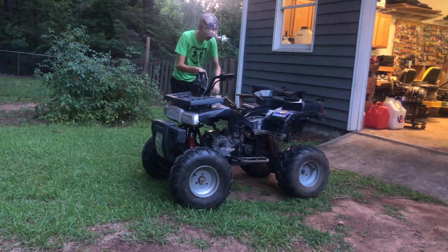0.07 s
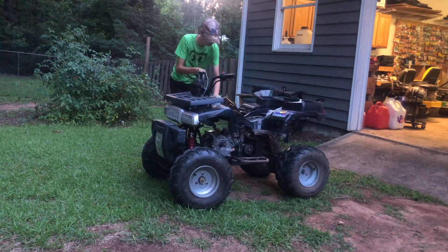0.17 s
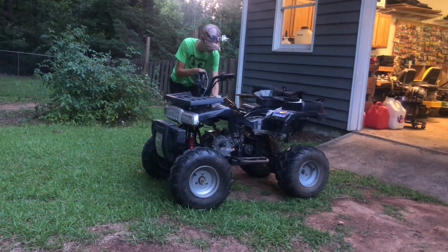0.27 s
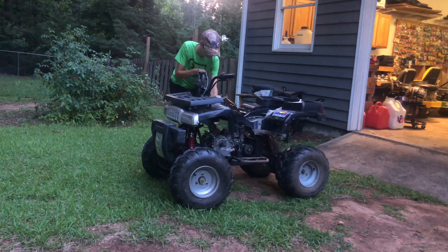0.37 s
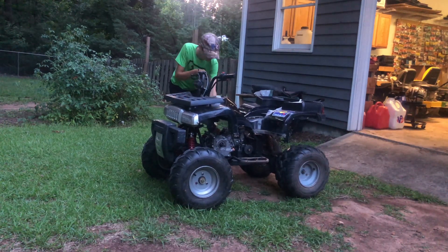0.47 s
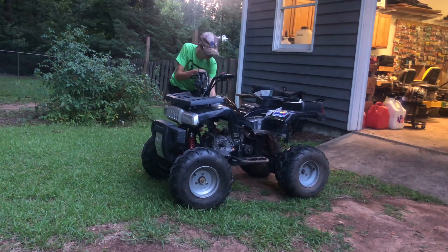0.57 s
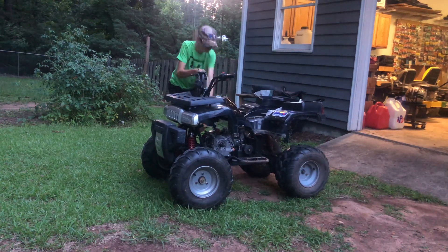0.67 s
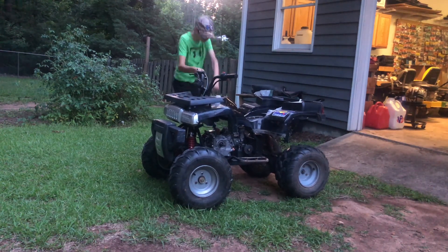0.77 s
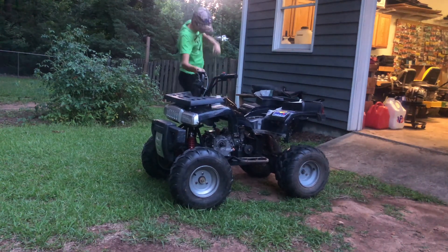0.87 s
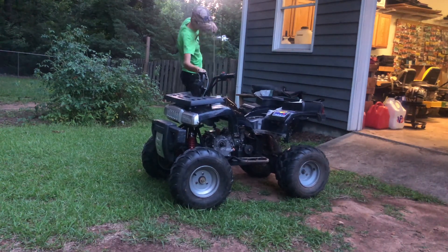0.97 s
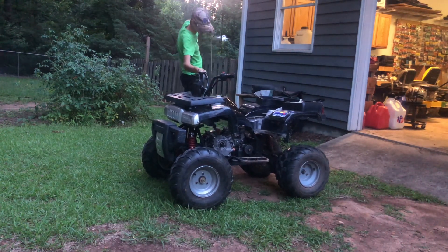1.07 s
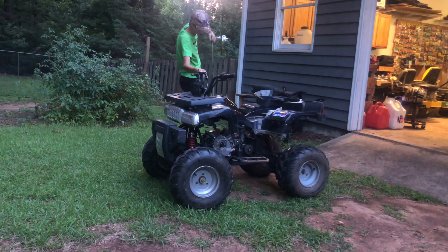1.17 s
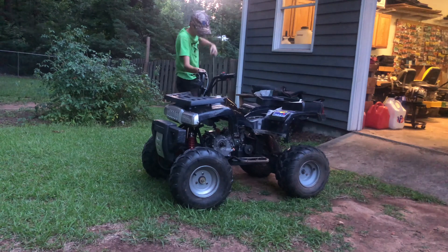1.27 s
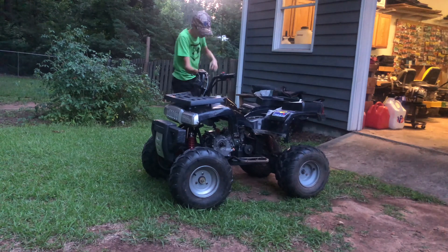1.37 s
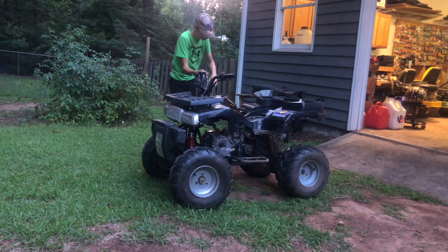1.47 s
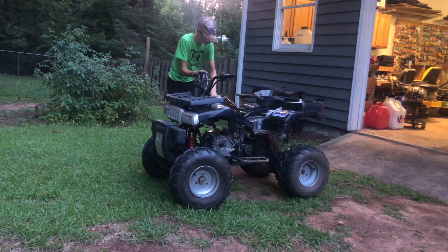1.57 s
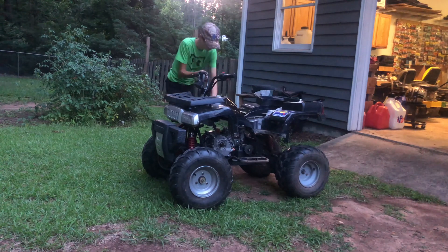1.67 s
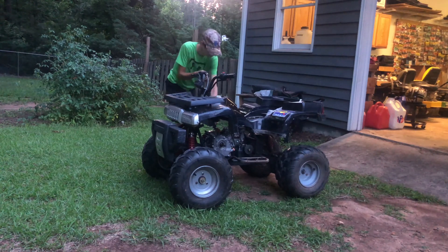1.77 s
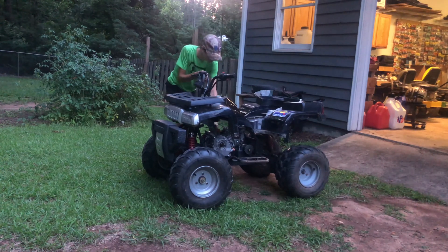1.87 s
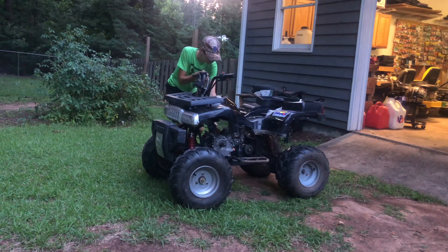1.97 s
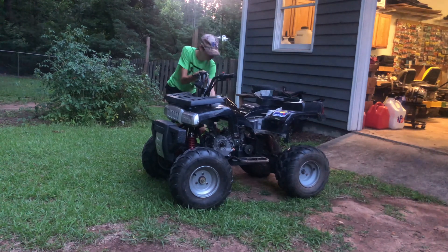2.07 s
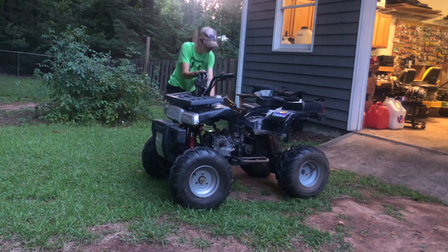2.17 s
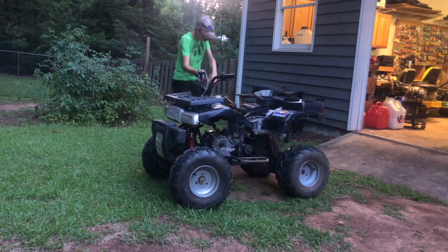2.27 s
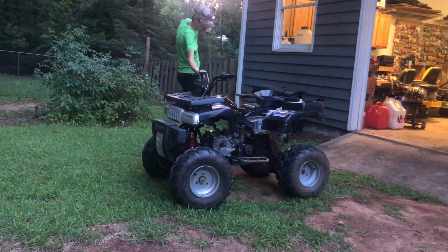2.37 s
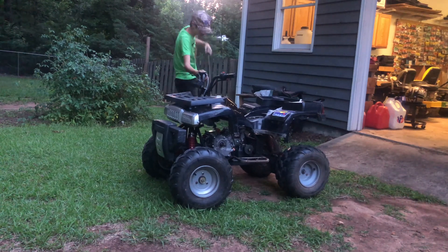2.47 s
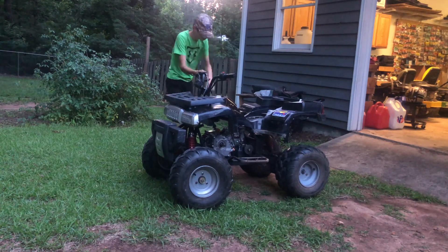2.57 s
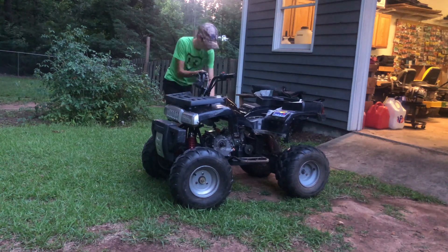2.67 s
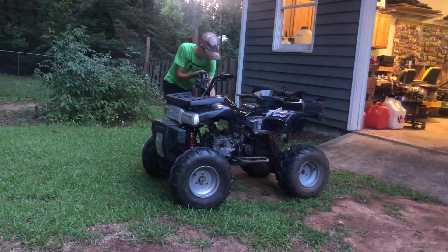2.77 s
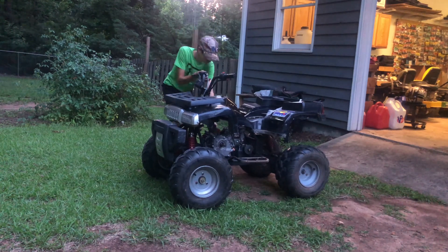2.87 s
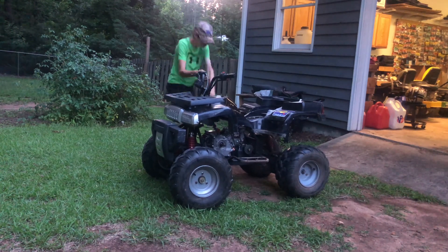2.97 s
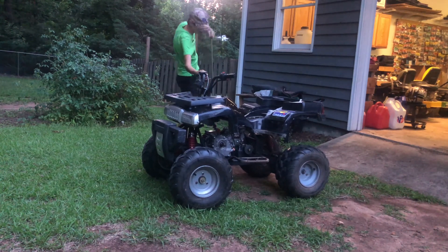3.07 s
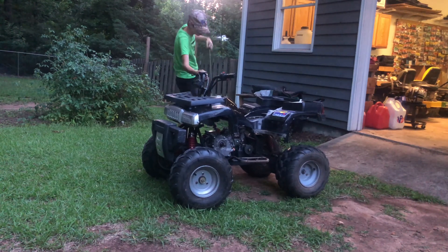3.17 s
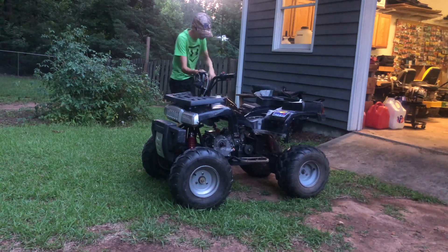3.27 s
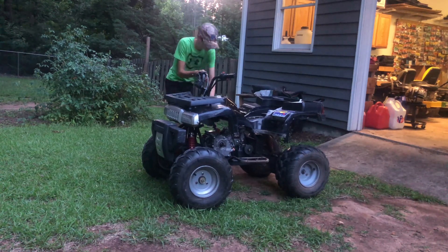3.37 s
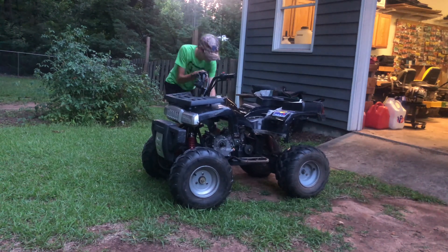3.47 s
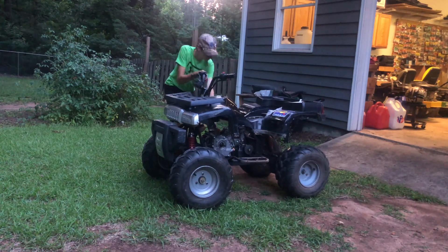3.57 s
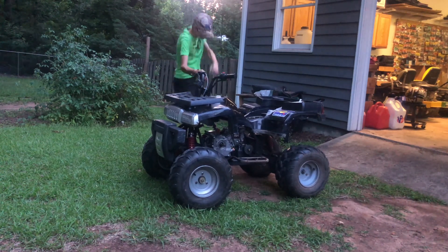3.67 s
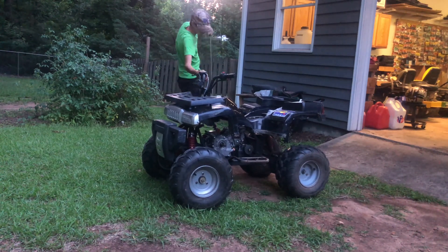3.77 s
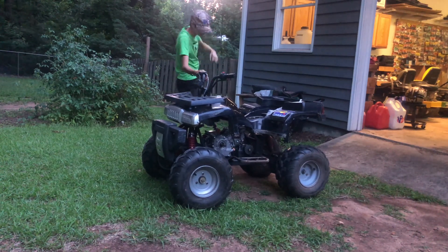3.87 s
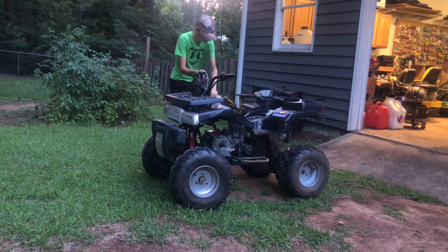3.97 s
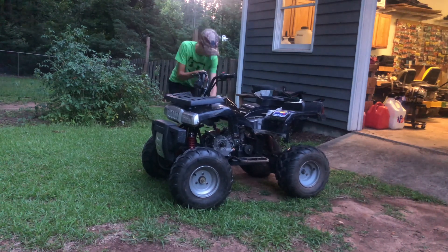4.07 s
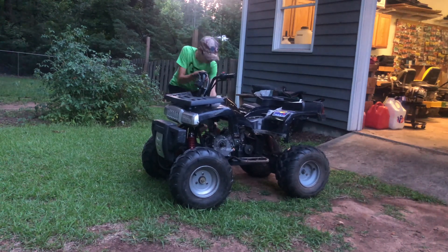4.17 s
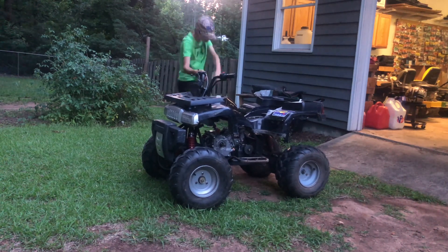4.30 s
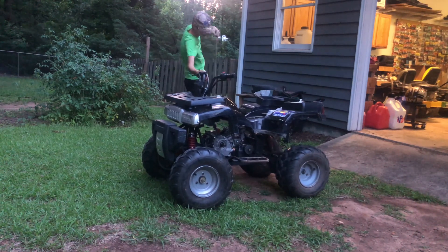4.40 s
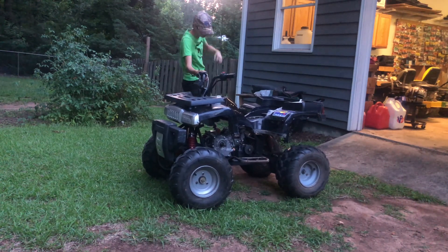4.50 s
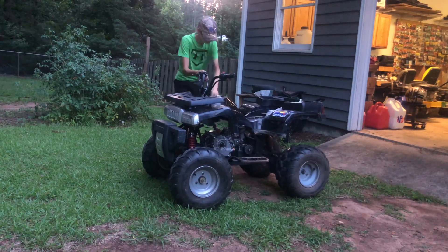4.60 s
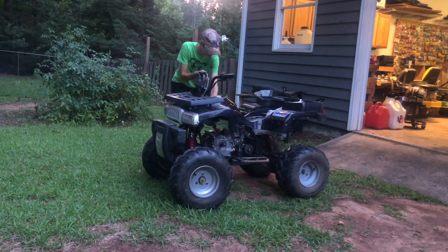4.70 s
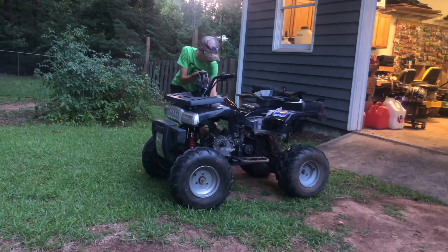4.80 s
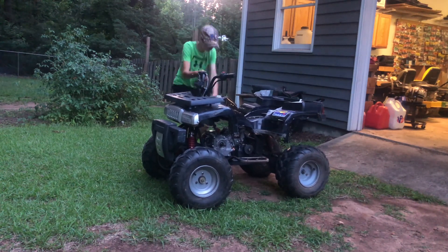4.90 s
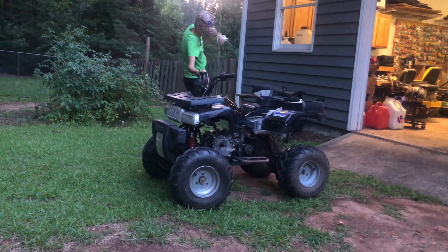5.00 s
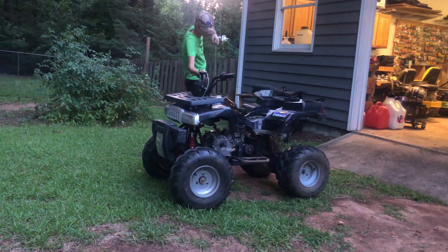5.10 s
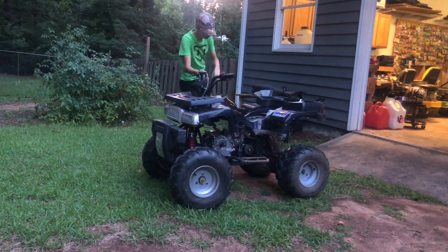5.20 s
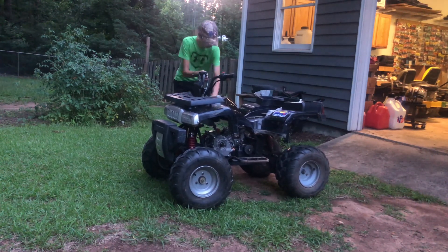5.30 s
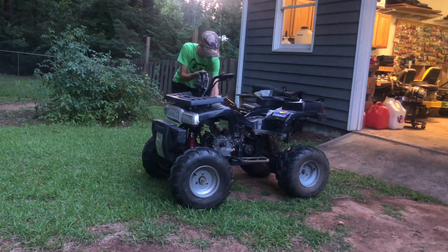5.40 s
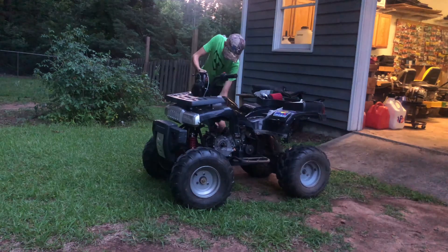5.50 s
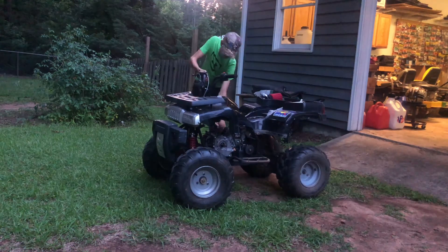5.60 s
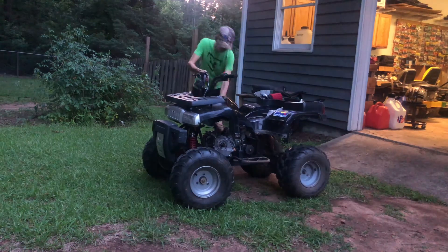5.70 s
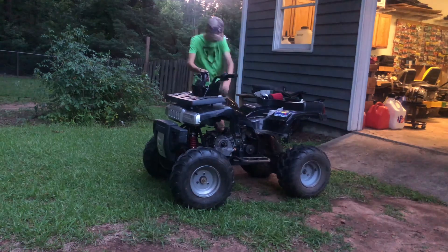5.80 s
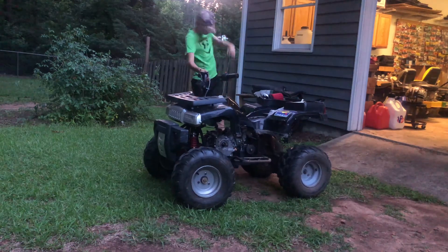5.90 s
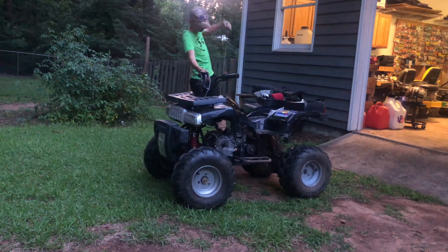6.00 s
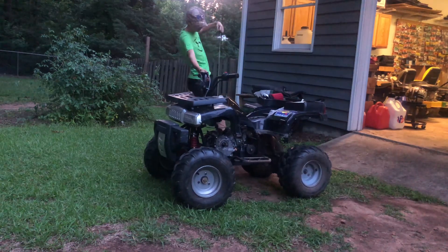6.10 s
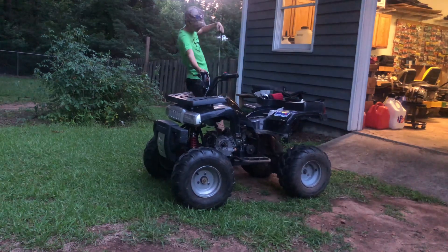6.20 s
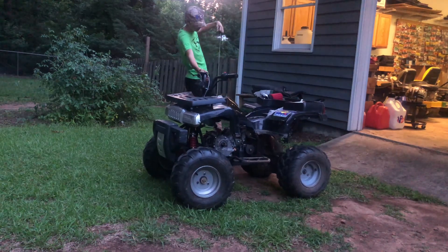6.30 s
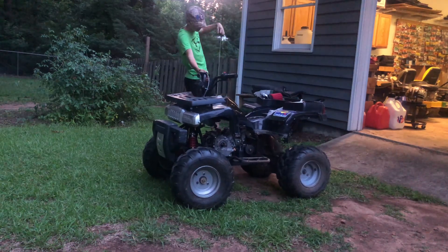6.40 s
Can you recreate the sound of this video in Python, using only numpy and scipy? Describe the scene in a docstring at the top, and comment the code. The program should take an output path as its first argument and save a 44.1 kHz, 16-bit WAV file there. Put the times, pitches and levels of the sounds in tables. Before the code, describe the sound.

Repeated failed pull-starts of a small quad-bike engine: metallic slam, cord rasp, low chuff, faint ring; the middle pulls race by sped-up and higher.

```python
"""On a lawn, a small quad-bike engine is pull-started seven times and never fires; insects hiss in the trees.
Each pull: the handle knocks, the pawls clack in, the cord rasps, the cylinder chuffs, and the frame rings on.
Contacts and cord are noise filtered by resonances, strokes are sines with air noise, the frame is decaying modes.
The middle pulls are played fast-forward, twice as quick and an octave up; Hz and decays are at natural speed."""
import sys
import numpy as np
from scipy import signal
from scipy.fft import rfft, irfft, next_fast_len
from scipy.io import wavfile

SR = 44100
rng = np.random.default_rng(int(sys.argv[2]) if len(sys.argv) > 2 else 0)


def transcribe(u):
    """Save the signal u as a 16-bit wav file named by the first command-line argument.

    u: samples, shape (n,) or (channels, n), limited to [-1, 1]; the rate is SR.
    q: integer samples, one column per channel.
    """
    v = np.clip(np.atleast_2d(u).T, -1, 1)
    q = np.round(v * 32767).astype(np.int16)
    wavfile.write(sys.argv[1], SR, q)


N = 284445

FAST_FROM, FAST_TO = 2.29, 5.46  # the double-speed stretch, in seconds of playing time
LENGTH = N + round((FAST_TO - FAST_FROM) * SR)  # samples at natural speed

# Pulls: the pawls tick out, slam into their cup, and the cord runs until its end.
# Each row: slam in seconds, slam level in dB, slam tilt in dB per octave, lead of the tick in seconds of
# lawn time, tick level in dB, end of the cord's run in seconds, cord level in dB; levels are relative.
PULLS = [(.668, -10.5, -3.5, .047, -21.5, 1.01, -37), (2.138, -14.5, -2, 0.031, -18.5, 2.44, -39),
         (2.931, -18, -4, 0.023, -39, 3.11, -40), (3.605, -15, -4.5, 0.033, -22, 3.836, -39),
         (4.247, -17, -4.5, .026, -19, 4.43, -37), (4.893, -13.5, -4, 0.04, -20, 5.12, -37.5),
         (5.7041, -15.5, -2.5, .029, -19, 6.05, -37)]
# Turns of the engine: the piston gulps air as the gears clatter, then booms into the pipe unless it stalls.
# Each row: start in seconds, gulp level in dB, clatter level in dB, gap to the boom in seconds of lawn time,
# boom level in dB, nominal boom pitch in Hz; levels are relative.
TURNS = [(.776, -31.5, -19.5, .074, -28.5, 72.4), (.954, -36, -27.5, .08, -43, 70),
         (2.262, -39, -36, .08, -51, 70), (2.302, -31.5, -14.5, .062, -27.5, 73.4),
         (2.962, -40.5, -24, .07, -29.5, 73), (3.042, -30.5, -15.5, .086, -29.5, 74),
         (3.652, -33.5, -18, .062, -27.5, 77), (3.73, -35.5, -17.5, .088, -33.5, 69),
         (4.305, -32.5, -17, .07, -28, 75), (4.393, -35, -23.5, .08, -48, 69.6),
         (4.977, -32.5, -15, .06, -29.5, 72), (5.039, -40, -41, .08, -50, 70),
         (5.857, -34.5, -18.5, .056, -28.5, 69), (5.945, -37, -33, .08, -50, 68),
         (6.038, -39, -26, .077, -35, 63.7)]
# Stops: the steel frame is struck as a pull ends. Each row: start in seconds, clack level in dB, ring level
# in dB, tilt of the ring in dB per octave, factor on the ring time; levels are relative.
STOPS = [(1.045, -22.5, -36, -1.5, 0.82), (3.106, -36, -50, -8.5, 0.7), (3.784, -27, -38.5, -1.5, 0.95),
         (4.424, -39, -34, -3.5, 0.87), (5.065, -22.5, -35.5, 5, 0.83), (6.027, -18, -38, -8.5, 0.14)]
# Spectrum of scraping and rattling parts. Each row: frequency in Hz, level in dB.
RASP = [(70, 5.5), (150, 7), (280, 5.5), (480, -1), (1000, 4), (1400, 2), (1850, -2.5), (4000, -5.5),
        (7000, -9), (11000, -26), (16000, -1.5)]


def gain_of(db):
    """Level law: decibels to an amplitude ratio."""
    return 10 ** (np.asarray(db) / 20)


def evened(x):
    """Normalization of signal power: scales to rms 1."""
    return x / np.sqrt(np.mean(x ** 2) + 1e-20)


def read(points, hz):
    """Interpolation on a logarithmic frequency axis."""
    f, value = np.transpose(points)
    return np.interp(np.log(hz + 1), np.log(f + 1), value)


def natural(s):
    """Time scaling: playing time to the time that passes on the lawn."""
    return s + np.clip(s - FAST_FROM, 0, FAST_TO - FAST_FROM)


def add(mix, s, sound, lag=0):
    """Superposition: adds a sound at playing time s, plus a lag in lawn time."""
    part = mix[round((natural(s) + lag) * SR):][:len(sound)]
    part += sound[:len(part)]


def seconds(size):
    """Sampling: the time axis of a signal in seconds."""
    return np.arange(size) / SR


def noise(spectrum, size, colour=None, tilt_db=0):
    """Spectral shaping of white noise; colour adds resonances, given as rows of Hz and dB."""
    n = next_fast_len(size)
    hz = np.fft.rfftfreq(n, 1 / SR)
    db = read(spectrum, hz) + tilt_db * np.log2(1 + hz / 1000)
    if colour is not None:
        db = db + read(colour, hz)
    white = rng.standard_normal(n)
    return evened(irfft(rfft(white) * gain_of(db), n)[:size])


def flutter(per_s, size):
    """Slow random modulation of rms 1: straight lines between random knots, per_s of them a second."""
    knots = rng.standard_normal(size)
    return evened(np.interp(seconds(size) * per_s, np.arange(size), knots))


def follow(curve):
    """Envelope interpolation: a curve of (playing s, value) laid on the natural time axis."""
    s, value = np.transpose(curve)
    return np.interp(seconds(LENGTH), natural(s), value)


def blow(x, t60, bass_lag, rise=0.00077):
    """Frequency-dependent damping: noise dies band by band; treble starts first and bass builds up."""
    hz, t, z = signal.stft(x, SR, nperseg=128)
    rise_time = rise + bass_lag / (1 + hz[:, None] / 900)
    onset = 1 - np.exp(-t / rise_time)
    decay = gain_of(-60 * t / read(t60, hz)[:, None])
    return signal.istft(z * decay * onset, SR, nperseg=128)[1][:len(x)]


def housing(ripple_db=4.0, spacing_hz=26):
    """Modal density: the metal casing's main resonances over a thicket of small modes, as rows of Hz and dB."""
    # Strongest resonances. Each row: frequency in Hz, width in Hz, lift in dB (before they are summed).
    main_modes = [(353.6, 16, 9.5), (568, 20, 12.5), (918, 14, 11), (1218, 95, 10.5), (1548, 92, 10.5),
                  (2157, 25, 9), (2435, 33, 6.5), (2890, 450, 4), (5640, 180, 7), (7920, 69, 12.5),
                  (9290, 560, 11.5)]
    hz = np.fft.rfftfreq(8192, 1 / SR)
    lift = 1 + sum((gain_of(db) - 1) / (1 + (2 * (hz - f) / width) ** 2) for f, width, db in main_modes)
    small_modes = np.clip(rng.standard_normal(len(hz)), -2, 2)
    thicket = np.interp(hz / spacing_hz, np.arange(len(hz)), small_modes)
    return np.column_stack([hz, 20 * np.log10(lift) + ripple_db * thicket * np.minimum(hz / 2500, 1)])


def contact(casing, ripple_db, spacing_hz):
    """Modal participation: each point of contact favours its own few modes of the casing."""
    hz, db = np.transpose(casing)
    own = np.interp(hz / spacing_hz, np.arange(len(hz)), rng.standard_normal(len(hz)))
    return np.column_stack([hz, db + ripple_db * np.clip(own, -2, 2) * np.minimum(hz / 1000, 1)])


def coupled(casing, share):
    """Partial coupling: the casing's colour, its dB scaled by a share, for a part that drives it less."""
    hz, db = np.transpose(casing)
    return np.column_stack([hz, share * db])


def garden(shimmer_db=-0.96, yard_db=-55, hum_hz=103, rumble_share=0.16):
    """Incoherent background: an insect chorus over low rumble that swells a little with a distant hum."""
    # Spectrum of the insects. Each row: frequency in Hz, level in dB.
    insect_spectrum = [(1470, -51), (2500, -22), (2640, -9.5), (3230, -20), (4020, 0.5), (4440, 2.5),
                       (4880, 1.5), (6810, -17), (7530, -11.5), (9080, 5.5), (11200, -9), (12800, 0.5),
                       (13900, 2), (15200, -7.5), (16000, -15)]
    # Level of the insects. Each row: playing time in seconds, level in dB.
    chorus_level = [(0, -41), (2.2, -42.5), (3.4, -44.5), (4.6, -44), (5.4, -42), (6.45, -41.5)]
    # Spectrum of the outdoor rumble. Each row: frequency in Hz, level in dB.
    yard_spectrum = [(30, -11.5), (55, 0), (95, -2), (165, -3), (240, -7.5), (350, -16), (480, -16),
                     (565, -12), (660, -19.5), (920, -11.5), (1300, -18.5), (2000, -27.5), (4000, -20),
                     (9000, -74)]
    # Hum of a distant machine, before it wavers. Each row: playing time in seconds, level in dB.
    hum_level = [(0, -56.5), (1.5, -54.5), (2.3, -51.5), (2.8, -54), (3.3, -58), (5.4, -64), (6.45, -101)]
    shimmer = shimmer_db * flutter(60, LENGTH)
    insects = noise(insect_spectrum, LENGTH) * gain_of(follow(chorus_level) + shimmer)
    hum_db = follow(hum_level)
    waver_db = 2.5 * flutter(9, LENGTH)
    hum_pitch = hum_hz + 2.6 * flutter(13, LENGTH)
    hum = np.sin(2 * np.pi * np.cumsum(hum_pitch) / SR) * gain_of(hum_db + waver_db)
    rumble_db = yard_db + rumble_share * (hum_db - hum_db.mean())
    return insects + noise(yard_spectrum, LENGTH) * gain_of(rumble_db) + hum


def bodywork(swell=0.014):
    """Heavily damped panel modes: soft hollow notes as the plastic is jolted and settles."""
    # Stray hollow notes. Each row: start in seconds, level in dB, pitch in Hz.
    stray_notes = [(0.188, -52.5, 925), (.675, -39, 204), (2.413, -39.5, 564), (2.517, -43, 487),
                   (6.024, -34, 1293)]
    out, t = np.zeros(LENGTH), seconds(size=8192)
    # lag in s, level in dB and pitch in Hz; the jolt's level is against its slam
    notes = [(s, 0.01178, db - 28, 535) for s, db, *_ in PULLS]
    notes += [(s, 0.058, -45.5, 559) for s, *_ in STOPS]
    notes += [(s, 0, db, hz) for s, db, hz in stray_notes]
    shape = t / swell * np.exp(1 - t / swell)
    for s, lag, db, hz in notes:
        add(out, s, gain_of(db) * shape * np.sin(2 * np.pi * hz * t), lag)
    return out


def knocks(level_db=-2.0, low_t60=0.16, high_t60=0.085, seat_hz=905, seat_db=-5, seat_t60=0.11):
    """Impact excitation: plastic double knocks of the handle, each with the short note of its seat."""
    # The rewound handle touches its seat, then knocks home. Each row: knock in seconds, relative level
    # in dB, lead of the touch in seconds of lawn time.
    handle_knocks = [(.418, -33.5, 0.048), (1.891, -34, 0.049), (2.796, -34.5, .052), (3.498, -32, 0.052),
                     (4.155, -33.5, 0.038), (4.778, -33, 0.024), (5.254, -41.5, 0.1), (5.434, -34, 0.038)]
    # Spectrum of the plastic. Each row: frequency in Hz, level in dB.
    knock_spectrum = [(300, -28.5), (570, -6.5), (760, -8), (900, 6.5), (1050, -7), (1220, -2), (1700, -14),
                      (2800, -17), (5000, -38), (12000, -42)]
    out, t = np.zeros(LENGTH), seconds(size=8192)
    seat = gain_of(seat_db - 60 * t / seat_t60) * np.sin(2 * np.pi * seat_hz * t)
    t60 = [(600, low_t60), (3000, high_t60)]  # (Hz, s)
    for s, db, lead in handle_knocks:
        for lag, softer_db in [(-lead, -10), (0, 0)]:  # the touch, then the knock
            snap = blow(noise(knock_spectrum, len(t)), t60, bass_lag=0.0012, rise=.0003)
            add(out, s, gain_of(db + softer_db + level_db) * (snap + seat), lag)
    return out


def rattle(casing, per_s=17, spread_db=4, t60=0.16, count=12):
    """Random impulse trains: loose parts tick by chance, each ringing the casing in its own way."""
    out, t = np.zeros(LENGTH), seconds(size=4096)
    for part in range(count):
        strength_db = spread_db * np.clip(rng.standard_normal(LENGTH), -2, 1.5)
        ticks = (rng.random(LENGTH) < per_s / SR) * gain_of(strength_db)
        colour = contact(casing, ripple_db=9.5, spacing_hz=59.77)
        ring = noise(RASP, len(t), colour) * gain_of(-60 * t / t60)
        out += signal.oaconvolve(ticks, ring)[:LENGTH]
    return evened(out)


def cord(casing, rattle_db=-2, hiss_db=-8, slack_db=-12, rewind_db=-15, run_down=0.03, rewind_time=0.39,
         slack_time=0.046, grip_time=0.043):
    """Friction noise: slack is taken up, the pulley rasps and rattles, then whispers as the spring rewinds."""
    t, level = seconds(LENGTH), np.zeros(LENGTH)
    for slam, _, _, lead, _, end, db in PULLS:
        since_tick = t - natural(slam) + lead
        since_end = np.maximum(t - natural(end), 0)
        speed = np.interp(since_tick, [-slack_time, 0, grip_time], [0, gain_of(slack_db), 1])
        pulling = np.exp(-since_end / run_down)
        rewinding = gain_of(rewind_db) * np.exp(-(since_end / rewind_time) ** 2)
        level += gain_of(db) * speed * (pulling + rewinding)
    hiss = noise(RASP, LENGTH, casing)
    return level * (gain_of(rattle_db) * rattle(casing) + gain_of(hiss_db) * hiss)


def impacts():
    """Contact mechanics: each steel contact's start s, lag s, dB, tilt dB per octave, rise s and decay factor."""
    # The pawls snap free of the cup. Each row: start in seconds, relative level in dB, tilt in dB per octave.
    releases = [(.971, -15.5, 6), (5.084, -30, -3), (5.835, -25.5, -5.5), (6.009, -22, -.5)]
    small_rise, small_tilt_db = 0.0013, -5.5  # s and dB per octave, for the lighter engine contacts
    backlash_lead, backlash_db = 0.0074, -11  # s; the gears touch before they clatter, dB against the clatter
    valve_lead, valve_db = .007, 2  # s; the valve clicks open before the boom, dB against the boom
    hits = []
    for s, db, tilt_db, lead, tick_db, _, _ in PULLS:
        tick_tilt_db = 2 - 0.3 * (tick_db + 19.5)  # softer ticks are given a brighter tilt
        hits += [(s, -lead, tick_db, tick_tilt_db, 0.0012, 0.9), (s, 0, db, tilt_db, 0.00082, 1.02)]
    for s, _, db, gap, boom_db, _ in TURNS:
        hits += [(s, -backlash_lead, db + backlash_db, small_tilt_db, small_rise, 1),
                 (s, .006, db, -2.5, 0.011, 1.16),
                 (s, gap - valve_lead, boom_db + valve_db, small_tilt_db, small_rise, 1)]
    # a stop's clack is 5 dB per octave brighter than its ring
    hits += [(s, 0, db, tilt_db + 5, .0006, 1) for s, db, _, tilt_db, _ in STOPS]
    return hits + [(s, 0, db, tilt_db, 0.00086, 1) for s, db, tilt_db in releases]


def clacks(casing, level_db=1, bass_lag=0.019, tail_db=-24, tail_t60=0.33):
    """Impact and reverberant decay: steel parts slam and chatter briefly; the casing rings on faintly."""
    # Spectrum of steel on steel. Each row: frequency in Hz, level in dB.
    clack_spectrum = [(90, -54), (200, -10.5), (500, -10), (950, -1), (1800, -3.5), (3500, -1.5),
                      (5500, -0.5), (7000, -0.5), (10000, -4), (16000, 0.5)]
    # Decay before each contact's factor. Each row: frequency in Hz, time to fall 60 dB in seconds.
    clack_t60 = [(300, 0.16), (1000, 0.086), (3000, .07), (8000, 0.073), (15000, 0.057)]
    out, t = np.zeros(LENGTH), seconds(size=8192)
    for s, lag, db, tilt_db, rise, hold in impacts():
        chatter = gain_of(1.8 * flutter(900, len(t)))
        colour = contact(casing, ripple_db=1.0, spacing_hz=87.8)
        metal = noise(clack_spectrum, len(t), colour, tilt_db) * chatter
        t60 = [(hz, band_t60 * hold) for hz, band_t60 in clack_t60]
        tail_level = gain_of(tail_db - 60 * t / tail_t60) * np.minimum(t / 0.0051, 1)
        tail = noise(RASP, len(t), casing) * tail_level
        add(out, s, gain_of(db + level_db) * (blow(metal, t60, bass_lag, rise) + tail), lag)
    return out


def frame(level_db=-2, twin_db=-11, split_hz=13):
    """Modal ringing of steel tubing: the strike's tilt weights the modes; each beats with a close twin."""
    # Modes. Each row: frequency in Hz, relative level in dB, 60 dB decay in seconds before the strike's factor.
    modes = [(951, -4.5, 0.61), (1176, -6, 1.06), (1210, -6.5, 0.61), (1225, -3, 0.14), (3000, -29, 2),
             (3028, -3.5, 2), (5354, 5, 0.46)]
    out, t = np.zeros(LENGTH), seconds(size=50000)
    strikes = [(s, db, tilt_db, hold) for s, _, db, tilt_db, hold in STOPS]
    # each slam rings the frame too, 29 dB softer and damped by the bracing hand
    strikes += [(s, db - 29, 1, 0.31) for s, db, *_ in PULLS]
    for s, db, tilt_db, hold in strikes:
        for hz, mode_db, t60 in modes:
            phase, twin_phase, apart = rng.random(3)
            twin_hz = hz + split_hz * (.5 + apart)
            twin = np.sin(2 * np.pi * (twin_hz * t + twin_phase)) * gain_of(twin_db)
            pair = (np.sin(2 * np.pi * (hz * t + phase)) + twin) * (1 - np.exp(-t / 0.00076))
            strike_db = db + level_db + mode_db + tilt_db * np.log2(hz / 2500)
            add(out, s, pair * gain_of(strike_db - 60 * t / (t60 * hold)))
    return out


def cylinder(swell=0.021, sag=0.075, boom_db=1, valve_db=1, echo_db=-12, echo_delay=.052):
    """Pulsed flow and reflection: strokes boom with sagging pitch, air rushes, and the wall sends it back."""
    # Spectrum of air in the airbox. Each row: frequency in Hz, level in dB.
    airbox_spectrum = [(80, 1), (125, 7.5), (210, -7), (275, -19.5), (345, 3), (420, -37), (700, -54),
                       (1500, -60)]
    gulp_hz, pipe_rasp_db = 101.9, -18
    out, t = np.zeros(LENGTH), seconds(size=12000)
    shape = (t / swell) ** 2 * np.exp(2 * (1 - t / swell))
    for s, gulp_db, clatter_db, gap, pipe_db, pipe_hz in TURNS:
        gulp_rasp_db = 0.5 + 0.5 * (clatter_db + 16)  # a slower turn draws its air more smoothly
        strokes = [(0, gulp_db, gulp_hz, gulp_rasp_db), (gap, pipe_db, pipe_hz, pipe_rasp_db)]
        for lag, db, hz, rasp_db in strokes:
            pitch = hz * (1 + sag * (np.exp(-t / 0.016) - .5) + 0.098 * flutter(70, len(t)))
            boom = np.sin(2 * np.pi * np.cumsum(pitch) / SR)
            air = gain_of(rasp_db + valve_db) * noise(airbox_spectrum, len(t))
            add(out, s, gain_of(db) * shape * (gain_of(boom_db) * boom + air), lag)
    return out + gain_of(echo_db) * np.roll(out, round(echo_delay * SR))


def near_insect(level_db=-54, start=4.35, swell=0.73, hz=5050, width_hz=350):
    """Amplitude-modulated band noise: one more insect joins in with a narrow, fluttering buzz."""
    band = [(hz - 2 * width_hz, -50), (hz - width_hz / 2, 0), (hz + width_hz / 2, 0), (hz + 2 * width_hz, -50)]
    buzz = noise(band, LENGTH)
    level = follow([(start, 0), (start + swell / 2, 1), (5.4, 1), (5.7, 0)])
    return buzz * level * gain_of(level_db + 0.97 * flutter(60, LENGTH))


def scene(low_cut_hz=46, cord_coupling=0.88):
    """Superposition and time compression: all sources, high-passed; the middle runs at double speed."""
    casing = housing()
    lawn = garden() + bodywork() + knocks() + cord(coupled(casing, cord_coupling))
    lawn += clacks(casing) + frame() + cylinder() + near_insect()
    high_pass = signal.butter(2, low_cut_hz, "high", fs=SR, output="sos")
    lawn = signal.sosfiltfilt(high_pass, lawn)
    first, count = round(FAST_FROM * SR), LENGTH - N
    fast = signal.resample_poly(lawn[first:first + 2 * count], 1, 2)
    return np.concatenate([lawn[:first], fast, lawn[first + 2 * count:]])[None]


def record(dry, dip_db=-16, dip_width=0.016, edge_hz=16100):
    """Band limiting: the level dips briefly where normal speed returns, then a low-pass trims the treble."""
    dip = gain_of(dip_db * np.exp(-((seconds(N) - FAST_TO) / dip_width) ** 2))
    low_pass = signal.firwin(511, edge_hz, window=("kaiser", 9), fs=SR)
    return signal.oaconvolve(dry * dip, low_pass[None], "same")


dry = scene()
out = record(dry)
transcribe(out)
```